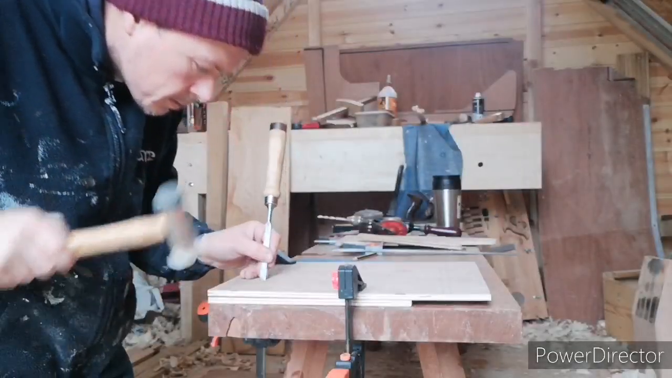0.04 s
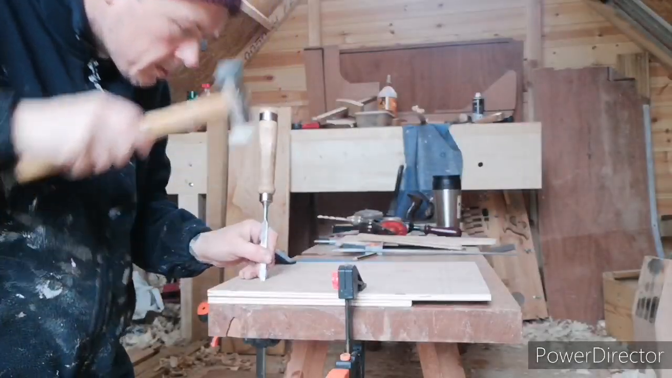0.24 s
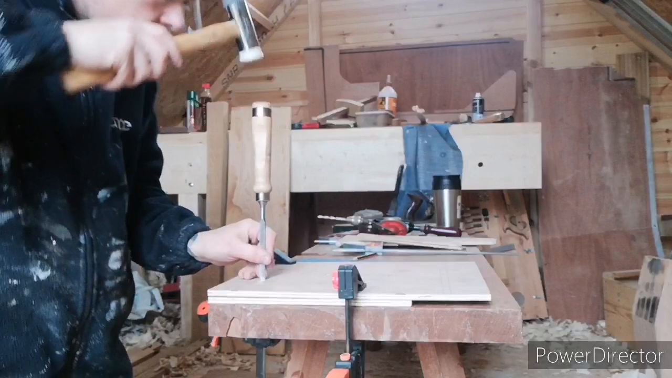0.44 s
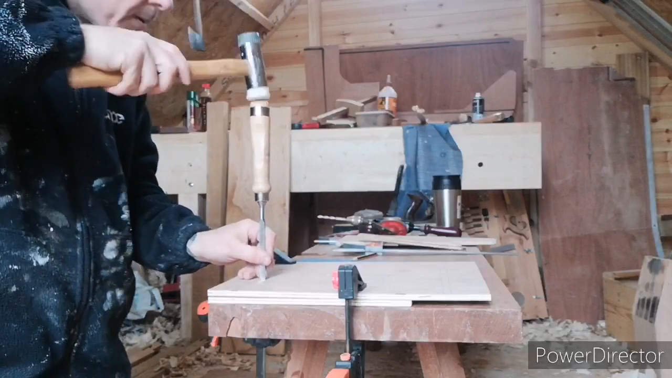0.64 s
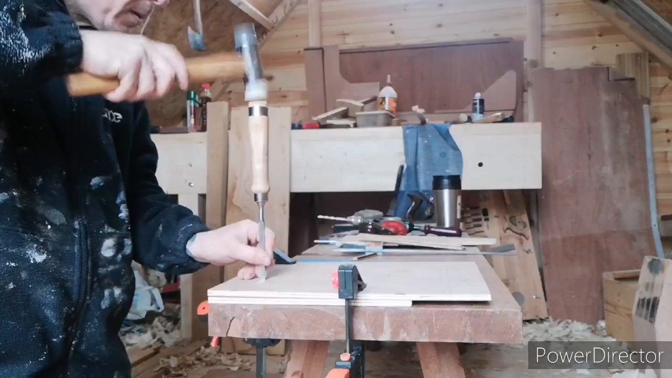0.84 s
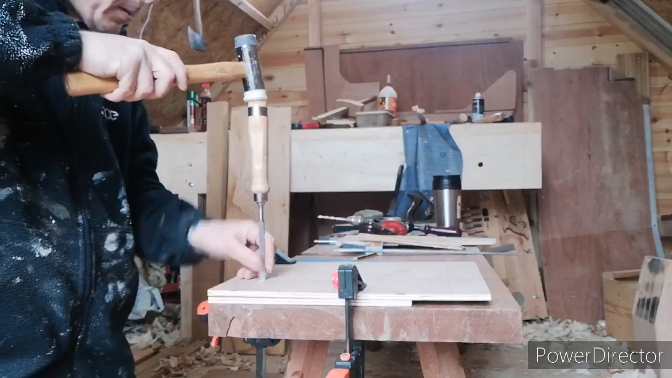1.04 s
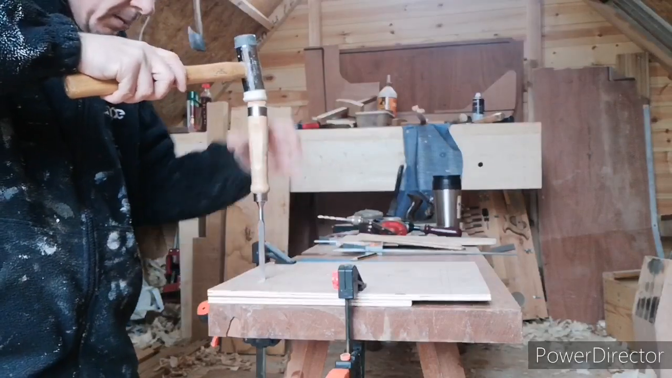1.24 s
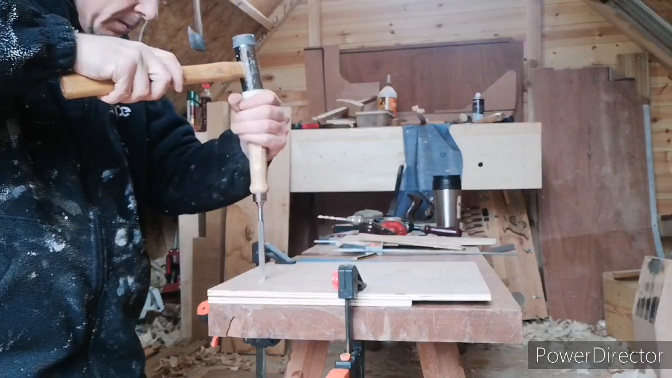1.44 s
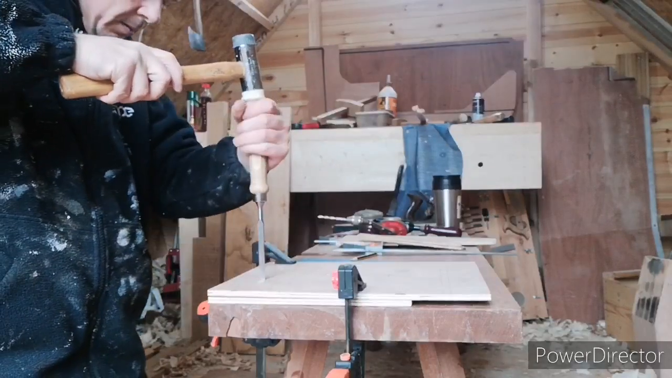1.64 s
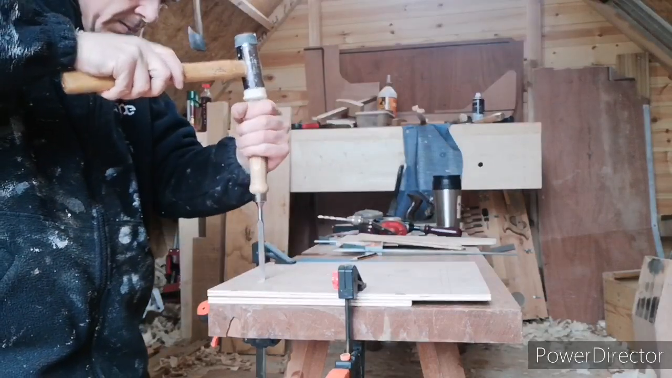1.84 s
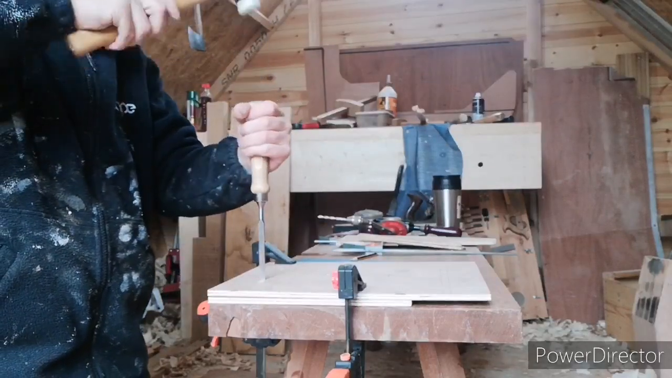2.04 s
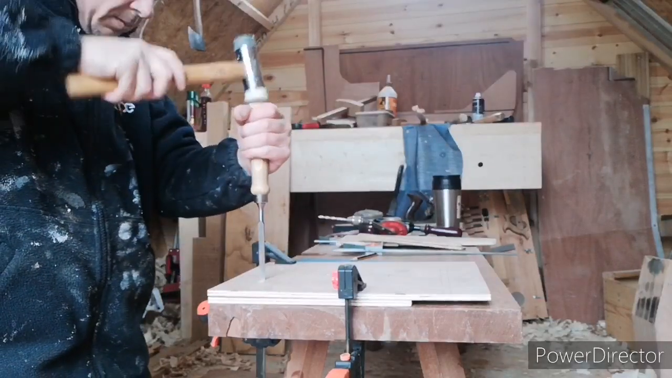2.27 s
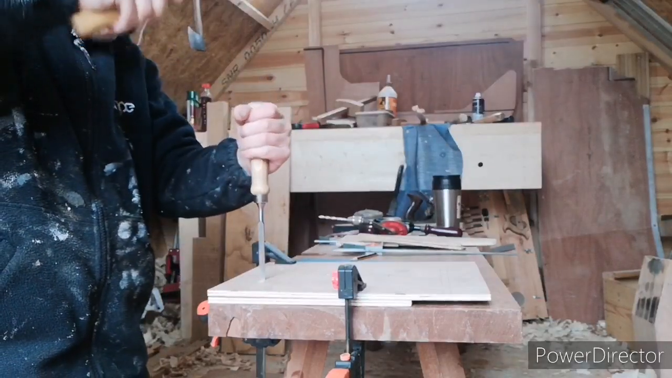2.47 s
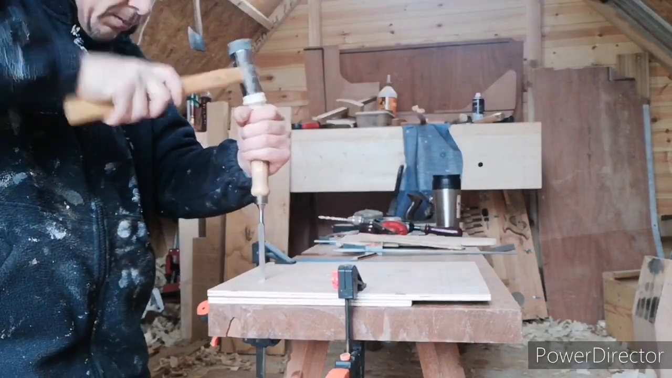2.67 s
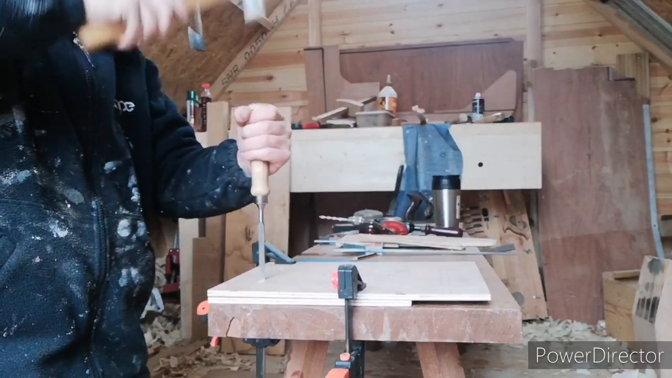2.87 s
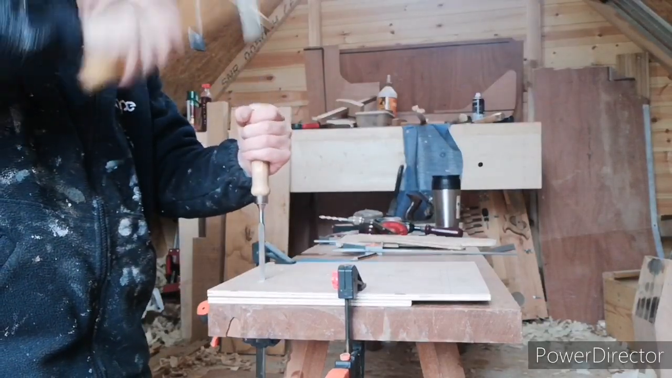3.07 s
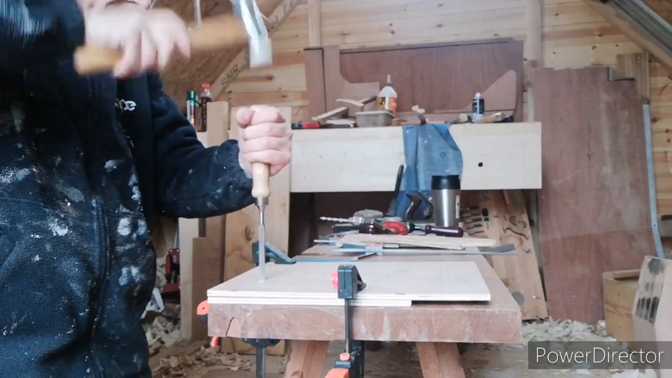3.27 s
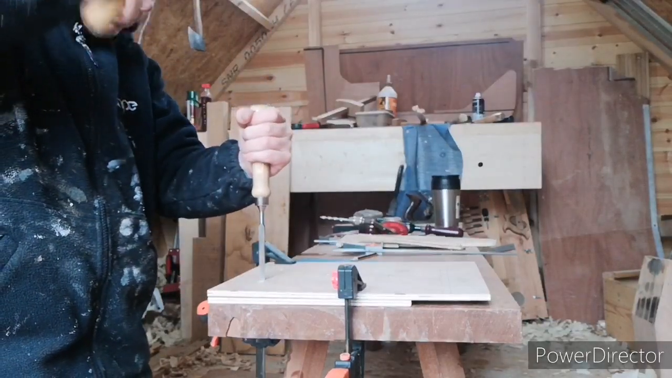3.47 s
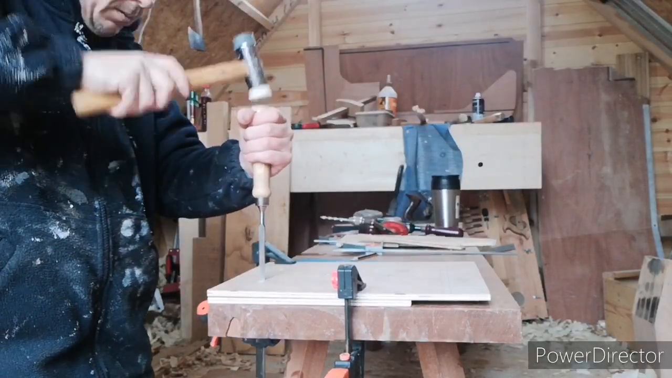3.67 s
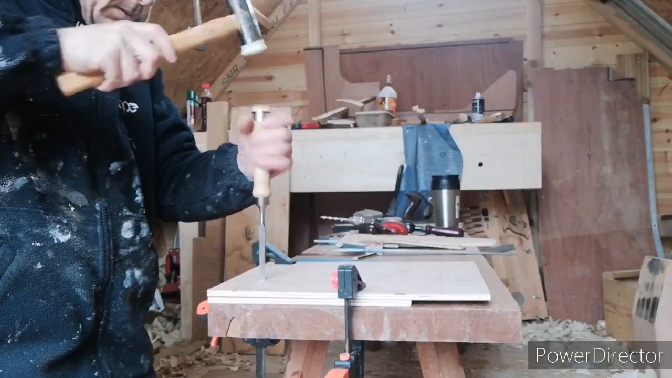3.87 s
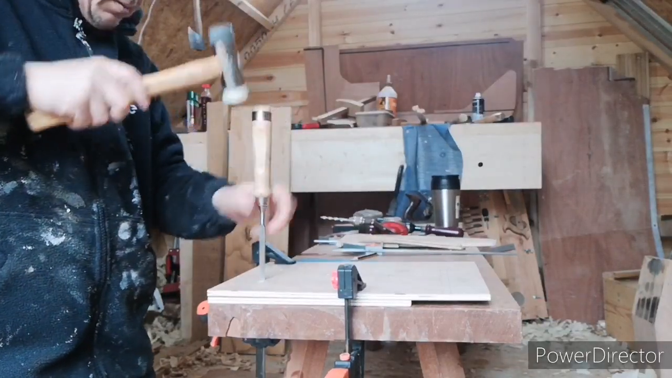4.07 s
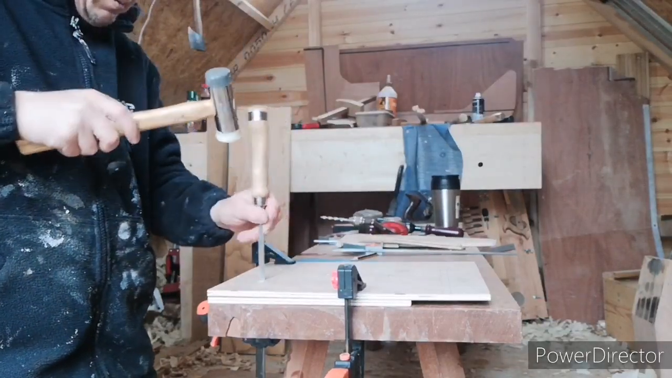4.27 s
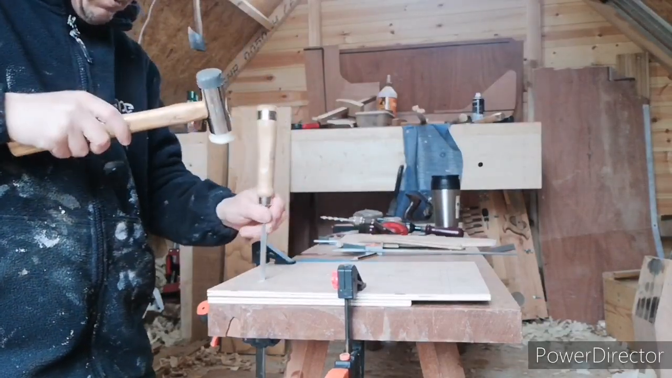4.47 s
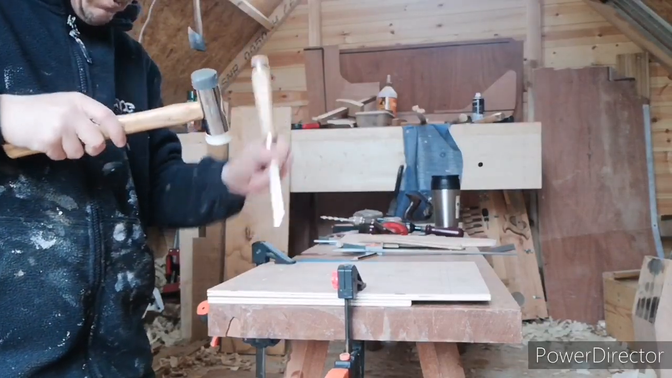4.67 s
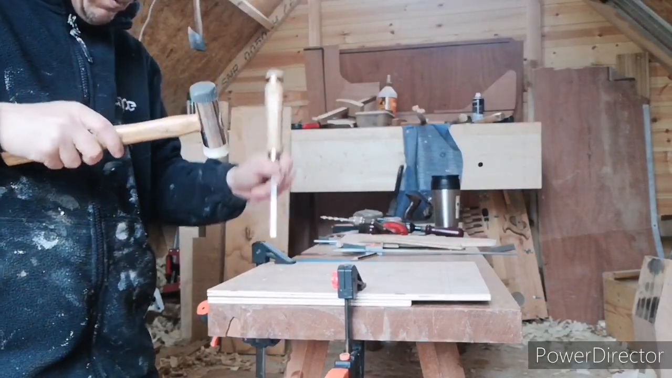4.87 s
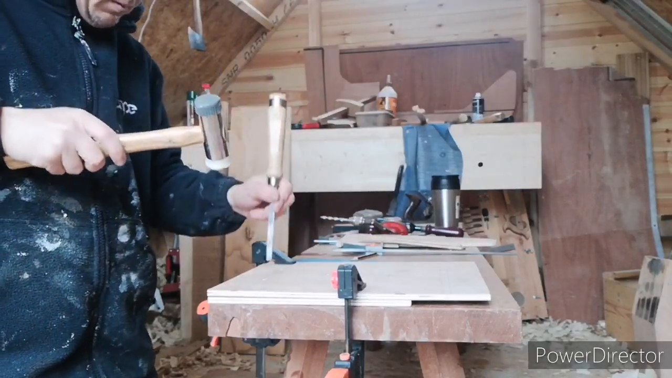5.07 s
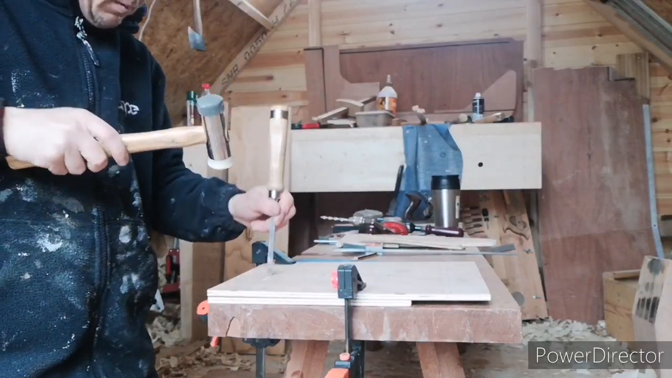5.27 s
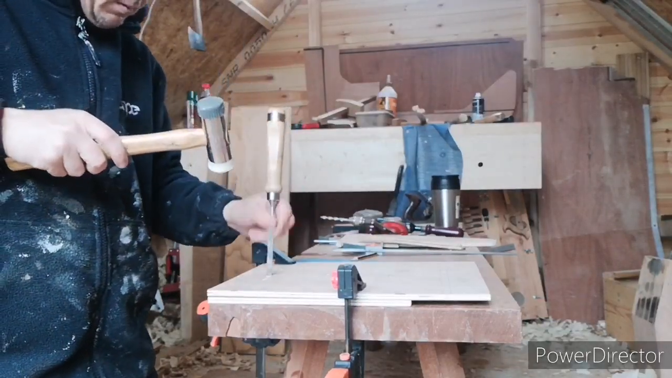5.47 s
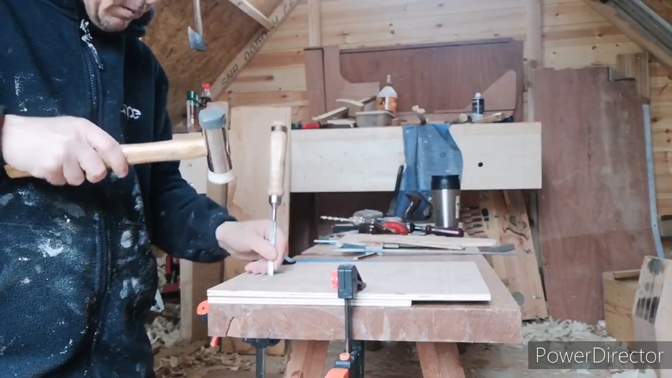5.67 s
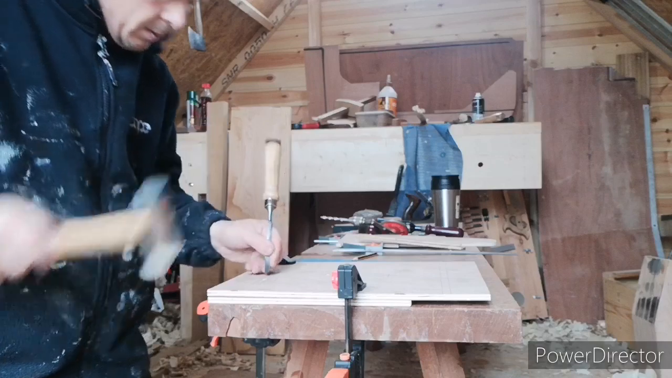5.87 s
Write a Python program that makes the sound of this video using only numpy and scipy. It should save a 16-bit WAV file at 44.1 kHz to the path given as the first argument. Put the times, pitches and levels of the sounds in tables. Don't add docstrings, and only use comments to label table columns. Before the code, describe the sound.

A mallet drives a chisel into clamped plywood in a small timber workshop: two light knocks, then four heavy booming cracks, then small handling knocks.

```python
import sys
import numpy as np
from scipy import signal
from scipy.fft import rfft, irfft, next_fast_len
from scipy.io import wavfile
from scipy.ndimage import uniform_filter1d, minimum_filter1d, map_coordinates

SR = 44100
rng = np.random.default_rng(int(sys.argv[2]) if len(sys.argv) > 2 else 0)


def persist_wave(psi):
    counts = np.round(np.clip(psi, -1, 1) * 32767).astype(np.int16)
    wavfile.write(sys.argv[1], SR, np.atleast_2d(counts).T)


def magnitude_from_level(level_db):
    exponent = np.asarray(level_db, float) / 20
    return 10 ** exponent


N = 261072

# start_s, crack_peak_db, contact_hardness_0_1, pitch_hz (handle and blade), tail_heard_s
BLOWS = [
    (0.828, -17.5, 0, 1320, 0.14),
    (1.05, -12, 0.14, 1414, 0.21),
    (2.346, -7, 0.88, 1800, .21),
    (2.833, -3.5, 0.56, 2243, 0.28),
    (3.292, -3, .9, 2230, .23),
    (3.7811, -3, 0.47, 1878, 0.26),
]
# mode_hz, level_db, t60_s, rise_s
BENCH_MODES = [(33, -26, 0.79, 0.06), (57.6, -20.5, 0.76, 0.071), (92, -18, .4, 0.014),
               (119.87, -7.5, 0.5, 0.054), (131.95, -11.5, 0.5, 0.0089), (139.46, 2.5, .13, 0.0064),
               (162.2, -13, 0.33, 0.036), (194.3, -18, 0.47, 0.02), (207, -10.5, 0.41, 0.012),
               (268.8, -15, 0.26, 0.0054), (223.5, -14, .3, 0.0075), (277.74, -11, .3, 0.0089),
               (329.6, -18, 0.36, 0.0046), (380, -26, 0.25, 0.0099), (417, -31, 0.4, 0.0085)]


def unit(x):
    return x / np.sqrt(np.mean(x ** 2) + 1e-20)


def along(points, hz):
    f, v = np.transpose(points)
    return np.interp(np.log(hz + 1), np.log(f + 1), v)


def coloured(x, points):
    m = next_fast_len(len(x) + 8192)
    gain = magnitude_from_level(along(points, np.fft.rfftfreq(m, 1 / SR)))
    return irfft(rfft(x, m) * gain, m)[:len(x)]


def add(track, s, sound):
    part = track[round(s * SR):][:len(sound)]
    part += sound[:len(part)]


def wander(n, rate):
    knots = rng.standard_normal(int(n * rate / SR) + 4)
    return map_coordinates(knots, [np.arange(n) * rate / SR])


def near(hz, centre_hz, fall_db):
    return -fall_db * np.log2(hz / centre_hz) ** 2


def burst(noise, spectrum_db, t60):
    hz, t, z = signal.stft(noise, SR, nperseg=256)
    colour = spectrum_db(hz)
    colour = magnitude_from_level(colour) / np.sqrt(np.mean(magnitude_from_level(2 * colour)))
    decay = magnitude_from_level(-60 * t / np.reshape(t60(hz), (-1, 1)))
    sound = signal.istft(z * colour[:, None] * decay, SR, nperseg=256)[1]
    return sound[:len(noise)]


def ring(t, hz, db, t60, rise, rough, rate):
    blur = rough * (1 - np.exp(-t * rate / 2))
    swell = magnitude_from_level(db - 60 * t / t60 + 4 * blur * wander(len(t), rate)) * (1 - np.exp(-t / rise))
    return swell * np.sin(2 * np.pi * hz * t + 2.2 * blur * wander(len(t), rate))


def handle_crack(t, walls, hard):
    # freq_hz, level_db (per Hz)
    crack_spectrum = [(210, -34.5), (350, -11), (546, -19.5), (1050, -9.5), (1460, -9), (1610, -3.5),
                      (1950, -7.5), (2280, -1), (2470, -8.5), (2900, -5), (3670, -8), (4890, -21),
                      (5300, -24), (9840, -66.5), (15600, -57.5)]
    # freq_hz, t60_s
    shed_t60 = [(300, .36), (700, 0.47), (1500, 0.36), (3000, 0.29), (5500, 0.33), (8000, .22),
                (10500, 0.085), (14000, .12)]
    tone = [(450, -0.5), (900, 0.00072), (2000, 0.001), (3200, -7.5 + 7 * hard), (5500, -6.5 + 7.5 * hard),
            (9000, -2 + 7.5 * hard), (12000, -7.5 + 14.5 * hard), (15000, -1 + 14.5 * hard)]
    noise = unit(0.66 * walls + rng.standard_normal(len(t)))
    crack = burst(noise, lambda hz: along(crack_spectrum, hz) + along(tone, hz),
                  lambda hz: 0.92 * along(shed_t60, hz))
    onset = 1 - np.exp(-(t / 0.0026) ** 2)
    return crack * onset * (1 + 0.077 * np.exp(-t / 0.012))


def handle_click(t):
    # mode_hz, level_db, t60_s
    click_modes = [(1320, -7.5, 0.0098), (2920, -1, 0.0099), (3900, -11.5, .006), (5300, -16, 0.0079),
                   (7760, -40.5, 0.011), (9500, -51.5, .004), (14000, -53.5, .006)]
    return sum(ring(t, *mode, rise=0.00052, rough=0, rate=9) for mode in click_modes)


def handle_ring(t, pitch_hz):
    # mode_hz, level_db, t60_s
    handle_modes = [(1069, 1, 0.3), (1320, -4.5, 0.36), (1416, -3, 0.12), (1629, -3.5, 0.39),
                    (1788, 2, .24), (1860, -1.5, 0.32), (1994, -5.5, .28), (2150, -2, .22),
                    (2270, -1.5, .3), (2536, -6, 0.13), (2850, 2.5, .18), (2990, 0, .18), (3480, -1, .15),
                    (4360, -1.5, .15)]
    wood = ring(t, pitch_hz, 5.5, t60=0.27, rise=0.0048, rough=.6, rate=45)
    for hz, level_db, t60_s in handle_modes:
        level_db = level_db + near(hz, pitch_hz, fall_db=10.5) + rng.normal()
        wood += ring(t, hz, level_db, t60_s, rise=0.01, rough=.8, rate=53)
    return wood


def bench_boom(t):
    # freq_hz, level_db
    shudder_spectrum = [(20, -16.5), (35, -11), (60, -2), (85, -9), (120, 1.5), (170, -8), (250, -11),
                        (350, -15), (500, -31), (900, -71)]
    boom = sum(ring(t, hz, level_db + rng.normal(0, 1.2), 0.95 * t60_s, rise_s, rough=0.7, rate=23)
               for hz, level_db, t60_s, rise_s in BENCH_MODES)
    swell = magnitude_from_level(-12 - 60 * t / 0.5) * (1 - np.exp(-t / 0.068))
    return boom + unit(coloured(rng.standard_normal(len(t)), shudder_spectrum)) * swell


def loose_tools(t):
    # mode_hz, level_db, t60_s
    steel_modes = [(1840, -41, .9), (2116, -37, .9), (2616, -40, .9), (2840, -38, .95), (3100, -42, .9),
                   (3280, -43, .9), (3850, -42, .9), (4110, -42, .9), (4837, -45, .75), (5300, -47, .7),
                   (5650, -47, .7)]
    ringing = sum(ring(t, hz, level_db + rng.normal(0, 1.5), 0.81 * t60_s, rise=.1, rough=.9, rate=40)
                  for hz, level_db, t60_s in steel_modes)
    landing = sum(ring(t[:SR // 4], hz, level_db + rng.normal(0, 1.5), 0.19, rise=0.023, rough=1.2, rate=60)
                  for hz, level_db, _ in steel_modes)
    return ringing, landing


def blows():
    out, t = np.zeros(N), np.arange(SR * 3 // 4) / SR
    walls = rng.standard_normal(len(t))
    for peak_s, db, hard, pitch_hz, tail_s in BLOWS:
        s = peak_s - .0002
        rattle_db = -3.5 + 1.8 * db
        ringing, landing = loose_tools(t)
        add(out, s, magnitude_from_level(db - 6.5) * handle_crack(t, walls, hard))
        add(out, s, magnitude_from_level(db + 7.5 * hard) * handle_click(t[:SR // 20]))
        add(out, s, magnitude_from_level(db - 17) * handle_ring(t[:SR // 2], pitch_hz))
        add(out, s, magnitude_from_level(rattle_db) * ringing)
        add(out, s + tail_s - 0.03, magnitude_from_level(rattle_db - 8) * landing)
        add(out, s + .003, magnitude_from_level(db + 1.5 - 6 * hard) * bench_boom(t))
    return out


def buzz():
    # start_s, level_db, held_s
    buzzes = [
        (3.295, -47, .04),
        (3.785, -39, .09),
    ]
    out, t = np.zeros(N), np.arange(SR // 3) / SR
    for s, db, held_s in buzzes:
        held = magnitude_from_level(-60 * np.maximum(t - held_s, 0) / .2)
        add(out, s, held * ring(t, 5210, db, t60=9, rise=.01, rough=.6, rate=70))
    return out


def singing_steel():
    # start_s, pitch_hz, level_db, t60_s
    songs = [(4.72, 3800, -70, 0.18), (4.91, 4200, -78, .15), (5.13, 4806, -79.5, 0.18),
             (5.13, 5800, -82, .15), (5.5, 2110, -69.5, .18), (5.5, 2603, -71, 0.21),
             (5.51, 2450, -73, 0.25), (2.2, 1300, -73, .25), (5.015, 426, -68, 0.28), (.29, 2300, -74, .3),
             (.3, 2200, -77, .3), (.35, 1800, -75, .2)]
    out, t = np.zeros(N), np.arange(SR * 3 // 4) / SR
    for s, hz, db, t60_s in songs:
        add(out, s, ring(t, hz, db, t60_s, rise=.006, rough=1.5, rate=160))
    return out


def puff(t, spectrum, t60_s):
    noise = unit(coloured(rng.standard_normal(len(t)), spectrum))
    return noise * magnitude_from_level(-60 * t / t60_s) * (1 - np.exp(-t / 0.006))


def thuds():
    # start_s, level_db, bench_pitch_hz
    leans = [(2.2, -69.5, 116.6), (3.581, -50, 317), (4.298, -67.5, 55), (4.57, -54, 225),
             (4.655, -47.5, 219.5), (4.699, -45.5, 122), (4.749, -50, 120.4), (4.97, -61.5, 240),
             (5.02, -52, 220), (5.1, -58.5, 130), (5.24, -60.5, 125), (4.02, -46.5, 260), (5.494, -39, 136),
             (5.5, -49.5, 280), (5.535, -40.5, 129.8), (5.589, -50, 130), (5.68, -64, 123.2)]
    # freq_hz, level_db
    thud_spectrum = [(60, -37), (120, 0.5), (200, -19), (280, -5), (400, -37), (800, -64)]
    out, t = np.zeros(N), np.arange(SR // 2) / SR
    for s, db, pitch_hz in leans:
        sound = magnitude_from_level(-20) * puff(t, thud_spectrum, .3)
        for hz, level_db, t60_s, _ in BENCH_MODES:
            level_db = level_db / 2 + near(hz, pitch_hz, fall_db=40)
            sound += ring(t, hz, level_db, .45 * max(t60_s, .4), rise=0.013, rough=.3, rate=26)
        add(out, s, magnitude_from_level(db) * sound)
    return out


def taps_and_ticks():
    # start_s, level_db, t60_s
    taps = [
        (3.06, -58, 0.37),
        (3.569, -62, 0.33),
        (4.551, -61, .52),
        (5.015, -72, 0.42),
    ]
    # start_s, level_db, t60_s
    ticks = [(0.28, -81, 0.7), (2.12, -67, .13), (2.2, -78, .4), (3.06, -53, 0.63), (4.031, -54, 0.34),
             (4.29, -85.5, .3), (4.52, -68.5, .1), (4.551, -80, 0.52), (4.721, -72, 0.31), (5.13, -79, .15),
             (5.494, -67.5, 0.27), (5.73, -68, .18)]
    # freq_hz, level_db
    wood_spectrum = [(150, -41.5), (400, -5.5), (800, -15.5), (1500, -25.5), (3500, -43.5), (6000, -60)]
    # freq_hz, level_db
    tick_spectrum = [(600, -18), (1500, 11), (2400, 14.5), (4000, 8.5), (5500, -14), (8000, -51)]
    out, t = np.zeros(N), np.arange(SR // 2) / SR
    for spectrum, events in (wood_spectrum, taps), (tick_spectrum, ticks):
        for s, db, t60_s in events:
            add(out, s, magnitude_from_level(db) * puff(t, spectrum, t60_s))
    return out


def room():
    # freq_hz, level_db (per Hz)
    rumble_spectrum = [(12, -31.5), (20, -0.5), (54, 1), (82, -14.5), (124, 0), (178, -21), (223, -12.5),
                       (450, -26.5), (580, -59.5), (990, -120)]
    # freq_hz, level_db (per Hz)
    air_spectrum = [(240, -26.5), (400, -3.5), (559, -3.5), (646, -9), (702, -1), (1920, -3), (2470, -5),
                    (2750, -5), (7000, -21), (9100, -48.5), (15400, -120)]
    rumble = magnitude_from_level(-67.5) * unit(coloured(rng.standard_normal(N), rumble_spectrum))
    air_gain = magnitude_from_level(-78.5 + 1.98 * wander(N, 0.74))
    return rumble + air_gain * unit(coloured(rng.standard_normal(N), air_spectrum))


def scene():
    return (blows() + buzz() + singing_steel() + thuds() + taps_and_ticks() + room())[None]


def suppressor(x):
    depth_db, bass_depth_db, bass_late_s = -14, -7, .04
    sag_s, fall_s, hold_s, back_s = 0.11, 0.02, 0.11, 0.11
    corners_s = [-sag_s, 0, fall_s, fall_s + hold_s, fall_s + hold_s + back_s]
    depth = [0, 0.46, 0.95, 0.5, 0.001]
    t, dip, bass_dip = np.arange(N) / SR, np.zeros(N), np.zeros(N)
    starts_s = [row[0] for row in BLOWS] + [N / SR]
    for (s, *_, tail_s), next_s in zip(BLOWS, starts_s[1:]):
        shut = t < next_s - .004
        since_s = t - s - tail_s
        dip += np.interp(since_s, corners_s, depth) * shut
        bass_dip += np.interp(since_s - bass_late_s, corners_s, depth) * shut
    upper = coloured(x, [(130, -44), (260, -1)])
    return magnitude_from_level(depth_db * dip) * upper + magnitude_from_level(bass_depth_db * bass_dip) * (x - upper)


def low_pass(x):
    return signal.sosfilt(signal.butter(12, 16190, fs=SR, output="sos"), x)


def record(dry):
    # freq_hz, gain_db
    band_limit = [(14900, 0), (15500, -9), (15800, -60)]
    x = coloured(suppressor(dry[0]), band_limit)
    peak = -minimum_filter1d(-np.abs(x), size=401)
    x = x / np.maximum(1, uniform_filter1d(peak, size=201) / .94)
    x = x + magnitude_from_level(-91) * rng.standard_normal(N)
    return low_pass(x[None])


dry = scene()
out = record(dry)
persist_wave(out)
```